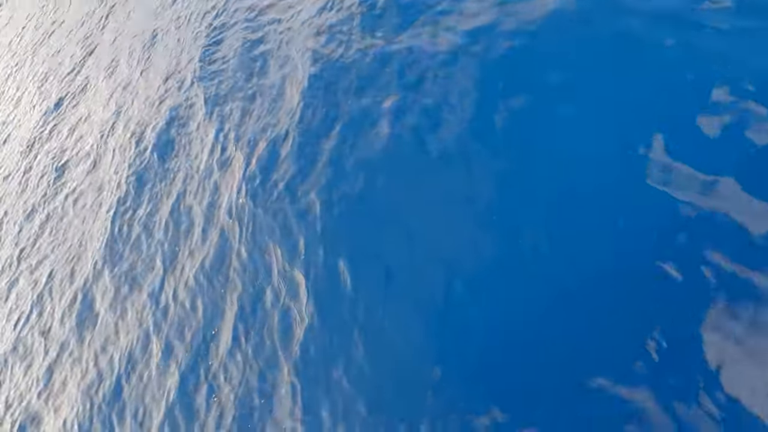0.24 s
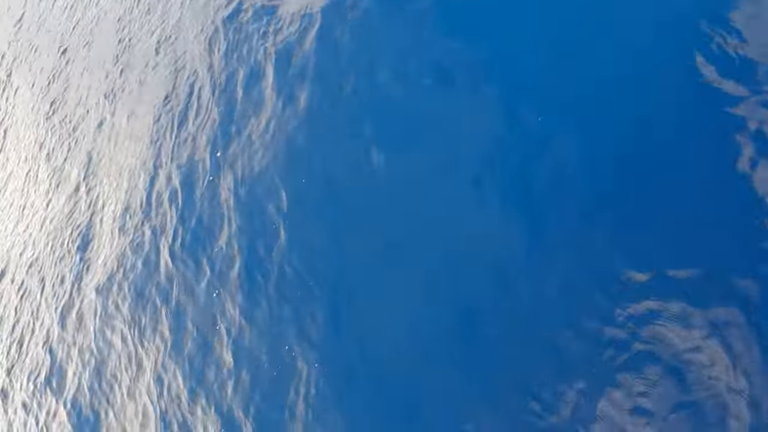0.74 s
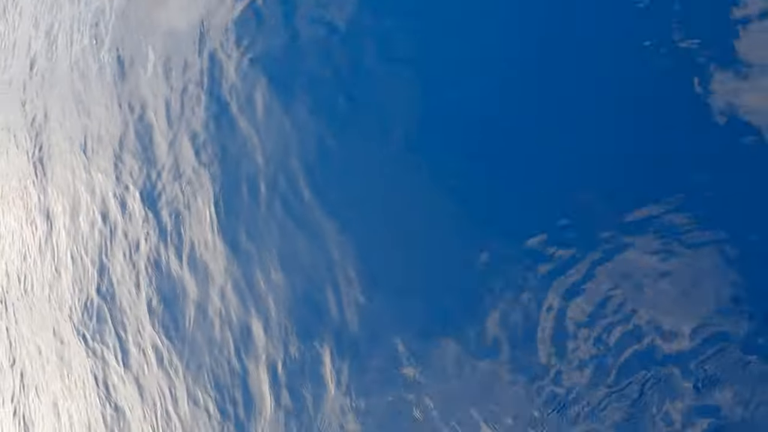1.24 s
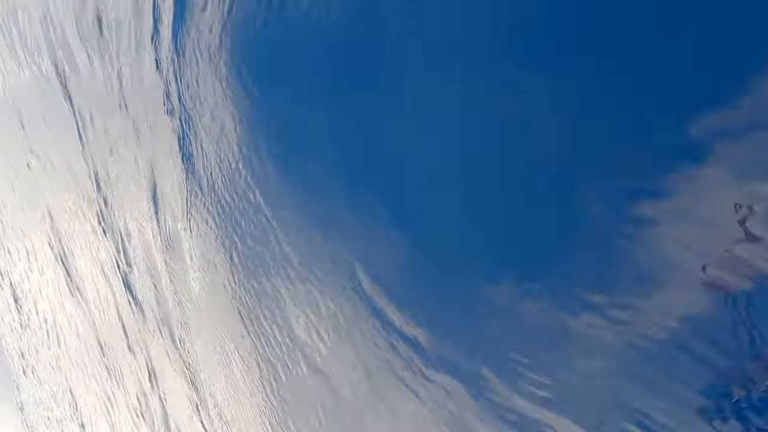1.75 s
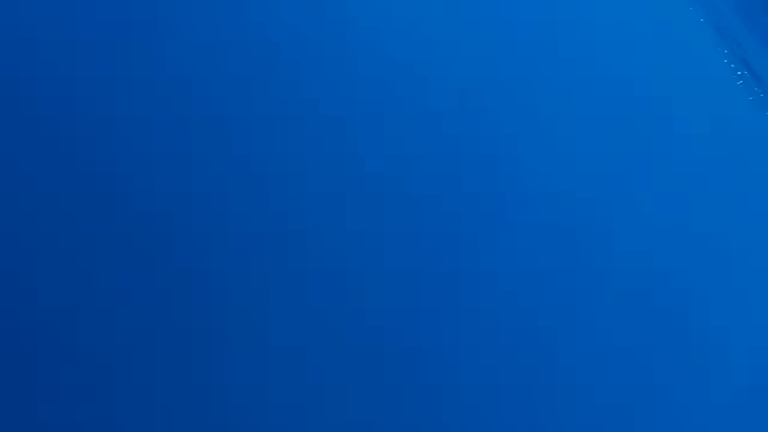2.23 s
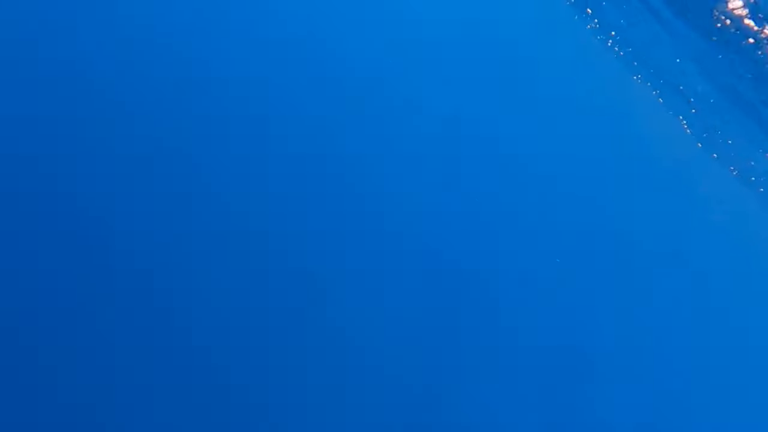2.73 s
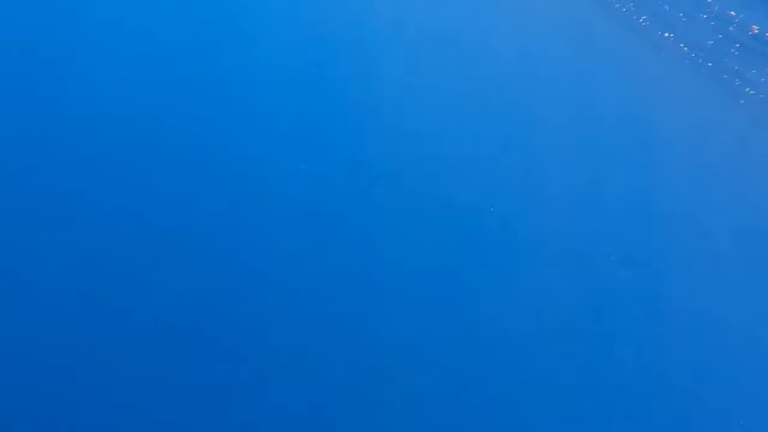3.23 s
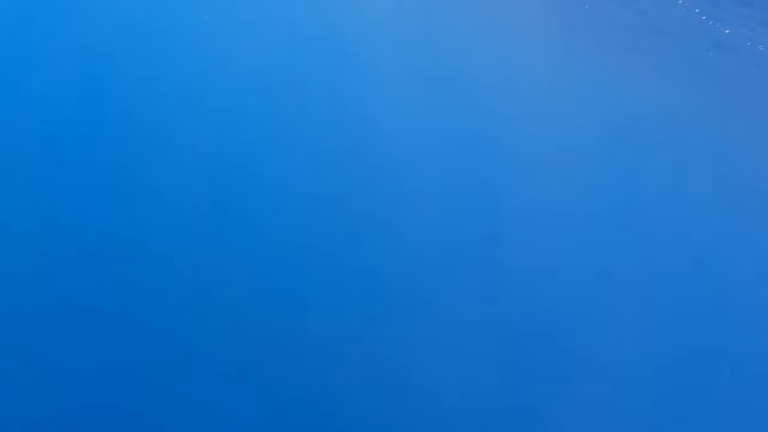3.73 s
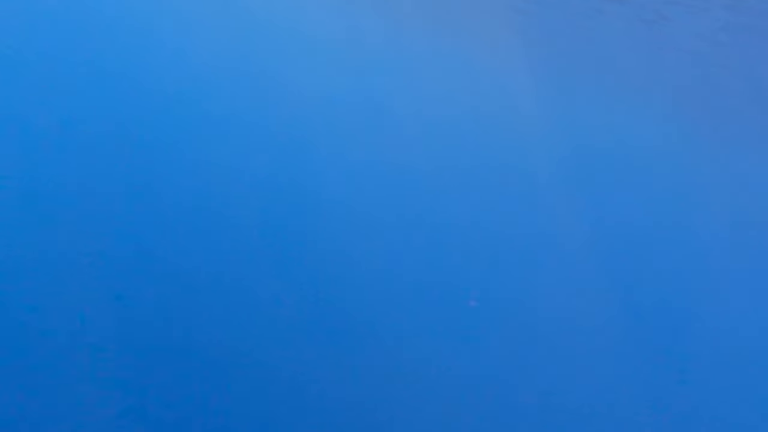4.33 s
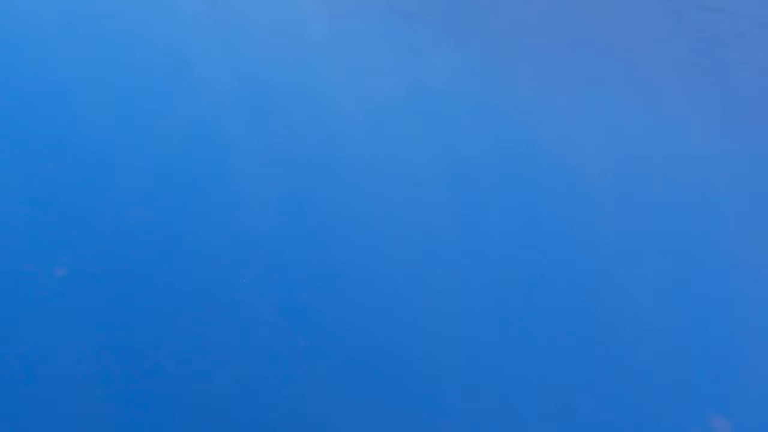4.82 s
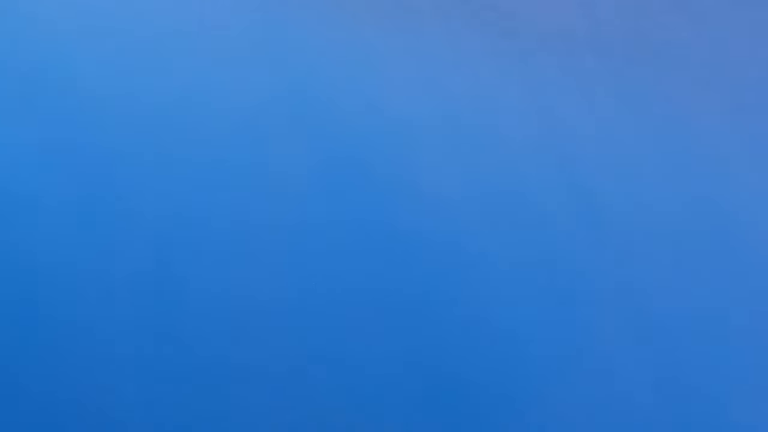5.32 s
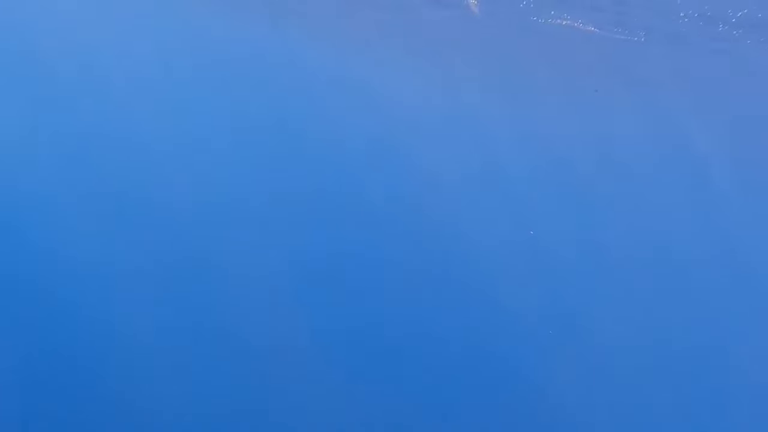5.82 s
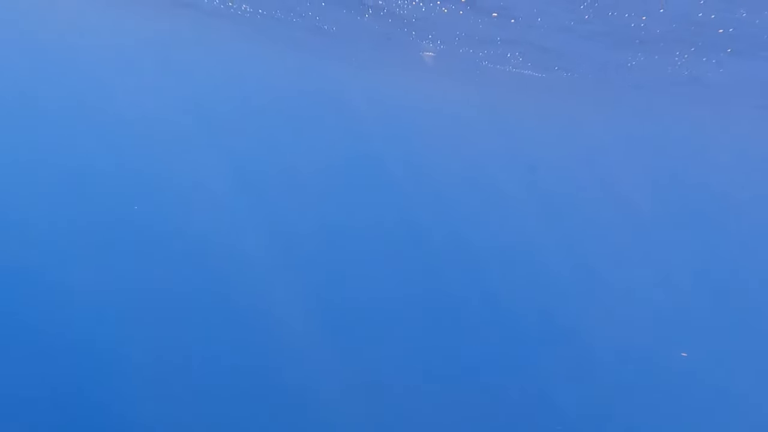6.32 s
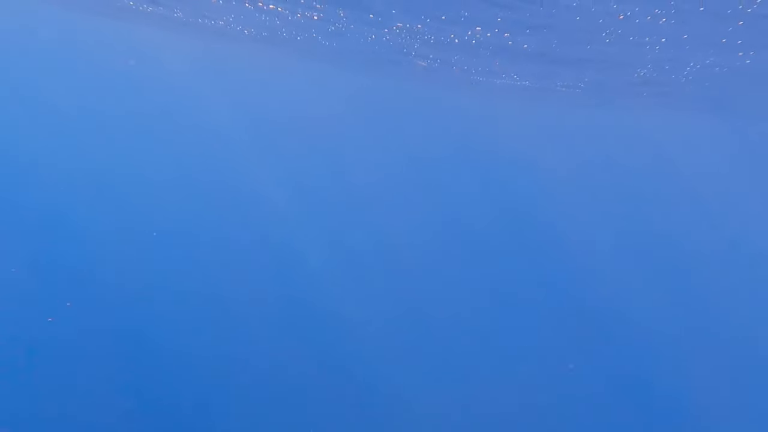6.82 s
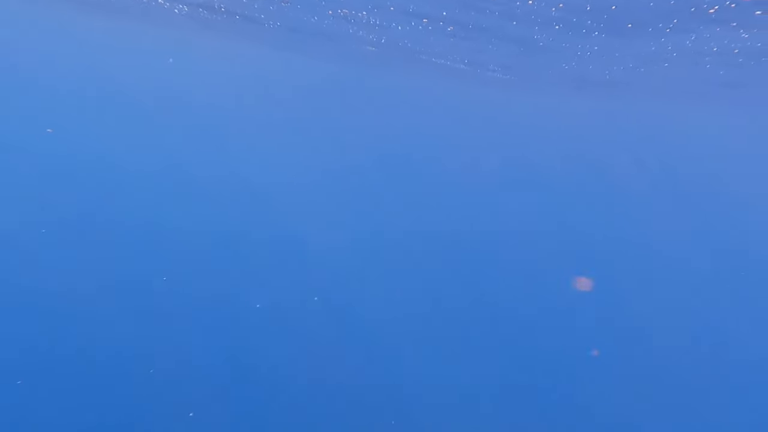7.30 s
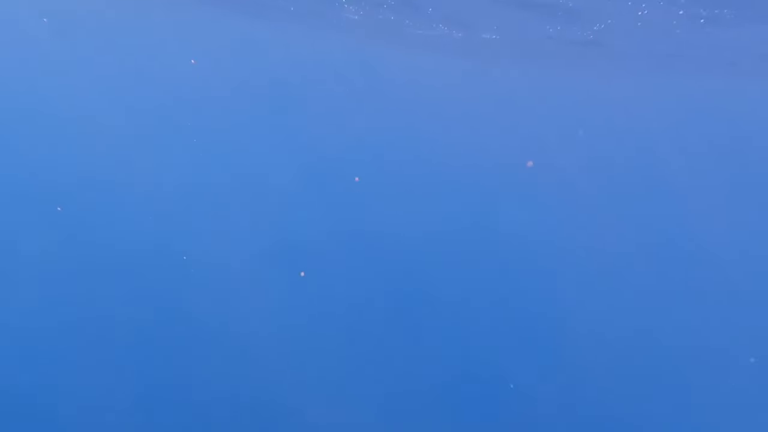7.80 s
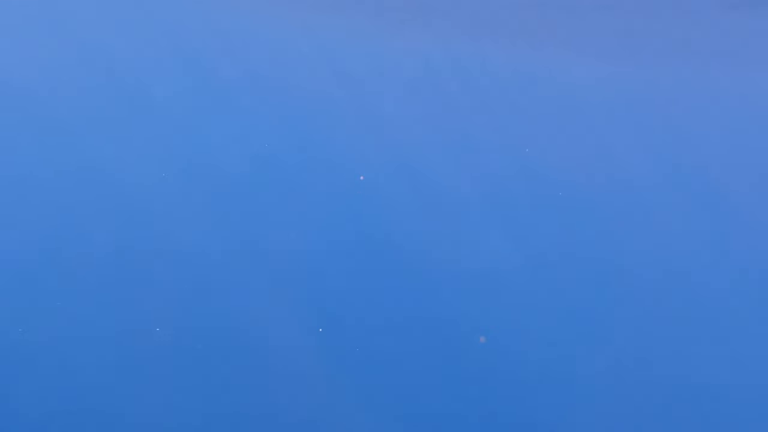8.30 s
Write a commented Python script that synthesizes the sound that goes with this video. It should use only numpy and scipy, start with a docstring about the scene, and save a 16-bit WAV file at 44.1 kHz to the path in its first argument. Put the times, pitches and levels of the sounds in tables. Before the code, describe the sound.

Low gusts in open air, a sharp splash and glugging bubbles, then a muffled underwater engine rattle joined by a wavering gear whine.

```python
"""At sea, beside an idling boat: a camera in its housing is lowered through the surface, heard by one microphone.
In air, shaped noise makes wind on the port and a distant thin hiss of engine and sea.
Then a fizzing splash with a low thump: noise spray, and damped sines for the entry and for bubbles leaving the housing.
Under water the six-cylinder engine throbs (tones) and knocks (struck resonances) through the hull;
it sags and recovers as the gear is engaged and a gear whine, a wavering tone, sets in."""
import sys
import numpy as np
from scipy import signal
from scipy.fft import rfft, irfft, next_fast_len
from scipy.io import wavfile
from scipy.ndimage import uniform_filter1d, map_coordinates

SR = 44100
rng = np.random.default_rng(int(sys.argv[2]) if len(sys.argv) > 2 else 0)


def field_ratio(decibels):
    """Amplitude ratio for a level in dB (20 dB per decade); scalars and array-likes work."""
    return 10 ** (np.asarray(decibels, dtype=float) / 20)


def inscribe(sig):
    """Save sig as 16-bit PCM at rate SR to the path in sys.argv[1].

    A 1-D sig is mono; a 2-D sig holds one channel per row.
    Samples are clipped to [-1, 1] before scaling.
    """
    pcm = np.round(np.clip(np.atleast_2d(sig).T, -1, 1) * 32767)
    wavfile.write(sys.argv[1], SR, pcm.astype(np.int16))


N = 377055


def unit(x):
    """Scaled to rms 1."""
    return x / np.sqrt(np.mean(x ** 2) + 1e-20)


def curves(rows):
    """One value per sample for each column after the time."""
    s, *columns = np.transpose(rows)
    return [np.interp(np.arange(N) / SR, s, column) for column in columns]


def during(rows):
    """1 while a table lasts, with edges smoothed over about 30 ms."""
    gate = np.interp(np.arange(N) / SR, [rows[0][0], rows[-1][0]], [1, 1], 0, 0)
    return uniform_filter1d(gate, size=SR // 30, mode="nearest")


def wobble(rate):
    """A smooth random curve, rate knots a second."""
    knots = rng.standard_normal(int(N * rate / SR) + 4)
    return map_coordinates(knots, [np.arange(N) * rate / SR])


def noise():
    """White noise of rms 1."""
    return rng.standard_normal(N)


def coloured(x, tone, modes=()):
    """x through a spectrum and resonant peaks (centre_hz, width_hz, level_db), rms 1."""
    m = next_fast_len(N + 8192)
    hz = np.fft.rfftfreq(m, 1 / SR)
    tone_hz, tone_db = np.transpose(tone)
    gain = field_ratio(np.interp(np.log(hz + 1), np.log(tone_hz + 1), tone_db))
    peaks = sum(field_ratio(db) / (1 + (2 * (hz - centre) / width) ** 2) for centre, width, db in modes)
    return unit(irfft(rfft(x, m) * gain * (1 + peaks), m)[:N])


def coloured_at_own_level(x, tone):
    """x through a spectrum, put back to the level it had."""
    return coloured(x, tone) * np.std(x)


def bubbles(s, size, hz, turns, rise):
    """Damped sines with a soft start that die away over some turns while their pitch drifts by rise."""
    t = np.arange(int(SR * 6 * turns / np.min(hz))) / SR
    age = np.outer(hz, t) / turns
    envelope = (1 - np.exp(-3 * age)) ** 2 * np.exp(-age)
    wave = size[:, None] * envelope * np.sin(2 * np.pi * turns * (age + rise * age * age / 4))
    at = (s * SR).astype(int)[:, None] + np.arange(len(t))
    return np.bincount(at.ravel(), wave.ravel(), N + len(t))[:N]


def swarm(rows, count, centre_hz, spread, turns, scatter_db):
    """Random bubbles over a table's span, pitches log-logistic round the centre, most rising, some falling; rms 1 there."""
    when, pitch, size, bend = rng.random((count, 4)).T
    s = rows[0][0] + when * (rows[-1][0] - rows[0][0])
    hz = centre_hz[(s * SR).astype(int)] * np.exp(spread * np.log(1 / np.clip(pitch, .02, .98) - 1))
    sizes = field_ratio(-scatter_db * np.log(size + 0.00061))
    x = bubbles(s, sizes, hz, turns, rise=.2 * (bend[:, None] - .35))
    return x / np.sqrt(np.mean(x[int(s.min() * SR):int(s.max() * SR)] ** 2))


def bursts(s, peak_db, rise, fall):
    """Gain of events that climb to a peak and fall away, both in dB per s; their powers add."""
    late = np.arange(N) / SR - np.asarray(s)[:, None]
    drop_db = np.where(late < 0, -rise * late, np.reshape(fall, (-1, 1)) * late)
    return np.sqrt(np.sum(field_ratio(2 * (np.asarray(peak_db)[:, None] - drop_db)), axis=0))


WIND_ENDS_S, GUST_RISE_DB_PER_S = 2.19, 1500
# gusts on the port: start of the fall (peak_s), peak_db, fall_db_per_s
GUSTS = [(0.231, -24, 250), (.36, -27, 100), (0.381, -17, 294), (.42, -25.5, 69), (0.584, -21, 51),
         (1.066, -20, 253), (1.224, -14, 249), (1.246, -14, 250), (1.288, -26, 95), (1.85, -29, 6),
         (2.037, -17.5, 81)]


def gusts():
    """Strength of the wind on the port until the water covers it: sharp rises, each with its own fall."""
    s, peak_db, fall = np.transpose(GUSTS)
    return during([(0,), (WIND_ENDS_S,)]) * bursts(s, peak_db, GUST_RISE_DB_PER_S, fall)


# air, then water, moving round the housing: time_s, rumble_db, deep_surge_db
FLOW = [(0, -34, -34.5), (1.2, -28, -27.5), (2.25, -31.5, -24), (2.36, -17, -19.5), (2.57, -26.5, -37.5),
        (2.86, -19.5, -25.5), (3.2, -26, -40), (3.31, -22.5, -28), (3.8, -33, -21.5), (4.5, -31, -33),
        (8.55, -27.5, -33)]
# spectrum of the rumble: pitch_hz, relative level_db per Hz
FLOW_TONE = [(30, -120), (50, -3), (70, 2.5), (100, -2.5), (130, -3), (200, -10), (300, -19), (400, -120)]
# spectrum of the deep surges: pitch_hz, relative level_db per Hz
SURGE_TONE = [(8, -120), (16, -11.5), (38, -2), (60, -5.5), (90, -120)]
SURGE_SWINGS_DB, SURGES_PER_S = 2.5, 6
GUST_RUMBLE_DB = -6.5  # what a gust adds to the rumble, over its own strength


def flow():
    """Air and then water moving past the housing rumble; gusts shake it too, and the deepest part comes in surges."""
    rumble_db, surge_db = curves(FLOW)
    rumble = coloured(field_ratio(0.7 * wobble(16)) * noise(), FLOW_TONE)
    rumble_gain = np.hypot(field_ratio(rumble_db), field_ratio(GUST_RUMBLE_DB) * gusts())
    surge = field_ratio(SURGE_SWINGS_DB * wobble(SURGES_PER_S)) * coloured(noise(), SURGE_TONE)
    return rumble_gain * rumble + field_ratio(surge_db) * surge


LULL_DB = -36  # wind left between gusts
# spectrum of the wind on the port: pitch_hz, relative level_db per Hz
WIND_TONE = [(65, -40), (110, 0.5), (329, -5), (361, -3.5), (419, -15.5), (459, -11.5), (542, -27),
             (800, -38), (1040, -63.5), (1760, -120)]
# hiss in air: time_s, level_db, treble_level_db
HISS = [(0, -43, -77.5), (.5, -43, -68.5), (.62, -40.5, -60), (.75, -43, -73), (1.25, -42, -72.5),
        (1.35, -46, -77), (1.8, -47.5, -89.5), (1.93, -42.5, -67.5), (2.1, -43.5, -82)]
# spectrum of the hiss: pitch_hz, relative level_db per Hz
HISS_TONE = [(290, -33), (500, -4.5), (783, -9.5), (830, -12), (964, -8.5), (1550, -15), (1990, -17),
             (2810, -17.5), (7840, -56.5), (10200, -72), (17200, -120)]
# spectrum of its treble: pitch_hz, relative level_db per Hz
HISS_TOP = [(3000, -42), (4200, -4), (5200, -2), (6200, -21), (8000, -59.5)]


def air():
    """Lumpy wind buffet on the port and a distant hiss of engine and sea, all shaped noise."""
    buffet = coloured(field_ratio(1.2 * wobble(38)) * noise(), WIND_TONE)
    wind = np.hypot(gusts(), field_ratio(LULL_DB) * during([(0,), (WIND_ENDS_S,)]))
    hiss = coloured(field_ratio(1.2 * wobble(20) + 1.2 * wobble(90)) * noise(), HISS_TONE)
    top = coloured(noise(), HISS_TOP)
    hiss_db, top_db = curves(HISS)
    return wind * buffet + during(HISS) * (field_ratio(hiss_db) * hiss + field_ratio(top_db) * top)


# films of water snapping on the port, close to the microphone: start_s, peak_db
SNAPS = [(2.1047, -14.5), (2.118, -12.5), (2.1763, -40.5), (2.2863, -42), (2.338, -24.5), (2.362, -40),
         (2.4646, -46), (2.6702, -35), (2.6813, -39.5), (2.9702, -53.5), (3.0056, -55)]
# spectrum of a snap: pitch_hz, relative level_db per Hz
SNAP_TONE = [(800, -46.5), (2500, 4), (6000, -8), (9000, -21.5), (12000, -40)]


def snaps():
    """Films of water snap as single sharp clicks, a fraction of a millisecond long."""
    s, db = np.transpose(SNAPS)
    spikes = np.bincount((s * SR).astype(int), field_ratio(db), N)
    clicks = coloured(spikes, SNAP_TONE)
    return clicks * spikes.max() / np.abs(clicks).max()


# housing breaking the surface: time_s, fizz_db, fizz_centre_hz, spray_db
FIZZ = [(2.05, -47.5, 1320, -82), (2.07, -65, 3000, -71.5), (2.114, -29, 3830, -24.5),
        (2.192, -22, 2130, -62), (2.23, -38, 2900, -62.5), (2.29, -29, 2150, -49.5),
        (2.302, -31.5, 2250, -63), (2.37, -30, 1700, -56.5), (2.484, -44, 1374, -63.5),
        (2.5, -74, 1424, -103)]
# spectrum of the spray: pitch_hz, relative level_db per Hz
SPRAY_TONE = [(2000, -54), (4000, -0.5), (6000, -7), (8000, -22.5), (11000, -36.5), (15000, -47)]


def surface():
    """Breaking the surface: a fizz of very many small bubbles that comes in clumps, under noise spray."""
    fizz_db, fizz_hz, spray_db = curves(FIZZ)
    fizz = swarm(FIZZ, count=1100, centre_hz=fizz_hz, spread=.14, turns=3.5, scatter_db=3.3)
    fizz = fizz * unit(field_ratio(5 * wobble(80)))
    spray = coloured(field_ratio(3.0 * wobble(120)) * noise(), SPRAY_TONE)
    return during(FIZZ) * (field_ratio(fizz_db) * fizz + field_ratio(spray_db) * spray)


# air still leaving the housing: time_s, gurgle_db, treble_db
GURGLE = [(2.1, -37, -28.5), (2.2, -53, -56), (2.262, -46, -29.5), (2.36, -19, -28.5),
          (2.425, -13.5, -32.5), (2.445, -36, -49), (2.485, -27.5, -45.5), (2.63, -22.5, -63),
          (2.7, -28.5, -47.5), (2.83, -17.5, -40), (2.93, -21, -59), (3.36, -31.5, -63), (3.6, -33, -75)]
# bigger gulps of air on top of it: peak_s, peak_db, treble_peak_db
GLUGS = [(2.156, -28, -28), (2.398, -14, -43), (2.539, -23.5, -39.5), (2.57, -24.5, -41.5),
         (2.667, -24, -32.5), (2.766, -18.5, -34), (2.886, -17, -34), (3.008, -32, -39.5),
         (3.166, -20, -55), (3.305, -33, -63.5), (3.516, -28.5, -59)]
GLUG_RISE_DB_PER_S, GLUG_FALL_DB_PER_S = 352.5, 212
TREBLE_DB_PER_S = 799  # rise and fall alike
# what the flooded hollows of the housing let through: pitch_hz, relative level_db
HOLLOWS = [(120, -31), (250, -7.5), (500, -7.5), (820, -1.5), (1000, -7), (1400, -10), (3000, -66.5)]
# water closing over the port dulls the small bubbles: pitch_hz, relative level_db
WET_PORT = [(400, -22.5), (1000, 3.5), (3000, -3.5), (3600, -7), (6000, -36.5), (12000, -71)]


def gurgle():
    """Air gurgles out of the hollows: a low and a high swarm of bubbles, swelling at each gulp."""
    low_db, high_db = curves(GURGLE)
    s, peak_db, treble_db = np.transpose(GLUGS)
    low_gain = np.hypot(field_ratio(low_db), bursts(s, peak_db, GLUG_RISE_DB_PER_S, GLUG_FALL_DB_PER_S))
    high_gain = np.hypot(field_ratio(high_db), bursts(s, treble_db, TREBLE_DB_PER_S, TREBLE_DB_PER_S))
    low = swarm(GURGLE, count=1000, centre_hz=np.full(N, 540.), spread=.18, turns=6, scatter_db=1.2)
    high = swarm(GURGLE, count=3200, centre_hz=np.full(N, 1800.), spread=0.17, turns=4.2, scatter_db=3.5)
    low = coloured_at_own_level(low, HOLLOWS)
    high = coloured_at_own_level(high, WET_PORT)
    return during(GURGLE) * (low_gain * low + high_gain * high)


# large bubbles, and the low thump (62 Hz) and knock (430 Hz, 2.148 s) of the housing entering the water:
# start_s, level_db before the envelope, pitch_hz, decay_turns, pitch_rise (ratio, below 0 falls)
ENTRY_AND_BUBBLES = [(2.369, -5, 258.6, 5.9, .05), (2.395, -3, 322, 6.4, .03), (2.474, -2.5, 390, 2.4, .03),
                     (2.143, -5, 61.96, 1.1, 0.012), (2.148, -5.5, 430, 1.5, -0.0012),
                     (2.412, -16, 535, 2, 0.018), (2.465, -9, 753, 9, 0), (2.512, -14, 731, 12, 0.033),
                     (2.552, -3, 441, 10, .14), (2.606, -22, 1090, 11, 0.021), (2.662, -3, 824, 5, -0.027),
                     (2.664, -3, 552, 11, 0.18), (2.76, -10.5, 1184, 6.4, 0),
                     (3.022, -4.5, 640, 4.2, 0.016), (3.168, -4.5, 340, 2.4, 0.0094),
                     (3.248, -6, 600, 4.5, 0.03), (3.26, -17.5, 1110, 11, 0.011),
                     (3.37, -6, 616, 3.7, -0.039), (3.399, -11, 348.6, 2.3, 0), (3.4, -17, 1060, 10, .05),
                     (3.521, -16.5, 1018, 7.2, 0), (3.526, -15.5, 1300, 7.3, 0),
                     (3.555, -8.5, 646, 11, -0.041), (2.762, -11, 751, 5.4, -0.014),
                     (2.878, -4, 691, 12, -0.18), (2.915, -7, 539, 10, -0.13), (2.945, -9.5, 741, 10, 0),
                     (3.076, -10.5, 412, 9, .05), (3.478, -7.5, 643, 14, 0), (3.072, -6, 537, 4.8, 0.022),
                     (3.167, -6, 470, 4.8, -.08), (3.158, -9, 718, 9, 0.065),
                     (3.27, -2.5, 455, 4.6, -0.019), (3.298, -0.5, 429, 3.2, .02),
                     (3.405, -6, 621, 8, -0.0038)]
# small bubbles and drops on the housing: start_s, level_db before the envelope, pitch_hz
TICKS = [(.12, -29, 1630), (1.171, -26.5, 1600), (2.098, -12, 2890), (2.106, -17, 3000), (2.117, -7, 4600),
         (2.125, -2.5, 3560), (2.136, -14, 3180), (2.149, -10, 3620), (2.183, -8.5, 1310),
         (2.187, -4, 2260), (2.2, -5, 2570), (2.2615, -15, 2620), (2.277, -9, 2780), (2.2874, -7.5, 2430),
         (2.309, -7.5, 1173), (2.3361, -7.5, 2840), (2.339, -9, 3230), (2.363, -25, 5170),
         (2.412, -19, 2140), (2.5376, -30, 2060), (2.5642, -28, 2630), (2.8426, -21.5, 1850),
         (2.8732, -25.5, 1960), (2.9702, -32, 1970), (3.0054, -34, 1890), (3.782, -34, 1900)]


def entry_and_single_bubbles():
    """The housing's entry thump and knock, and bubbles and drops heard one by one, each a damped sine."""
    entry_and_large = sum(bubbles(np.array([s]), field_ratio(np.array([db])), np.array([hz]), turns, rise)
                          for s, db, hz, turns, rise in ENTRY_AND_BUBBLES)
    s, db, hz = np.transpose(TICKS)
    return entry_and_large + bubbles(s, field_ratio(db), hz, turns=4.1, rise=0.1)


# engine speed: time_s, firings_per_s
SPEED = [(0.0, 26.75), (3.3, 25.94), (4.0, 26.63), (4.6, 26.07), (5.15, 26.37), (5.35, 23.76), (5.55, 23.5),
         (5.7, 22.43), (5.9, 25.2), (6.15, 25.01), (6.5, 24.52), (7.2, 25.03), (7.9, 24.64), (8.55, 25.08)]


def firings():
    """Running count of cylinder firings; six make an engine cycle."""
    return np.cumsum(curves(SPEED)[0]) / SR


# gear whine: time_s, pitch_hz, level_db
WHINE = [(5.2, 670, -48), (5.39, 703, -22), (5.62, 672, -24), (5.72, 715, -30), (5.98, 748, -34),
         (6.2, 735, -38), (6.38, 720, -25), (6.55, 738, -36), (6.78, 748, -29.5), (7.1, 742, -28.5),
         (8.55, 742, -28.5)]
# a faint gear line that moves with the whine once the speed settles: ratio to its pitch, rms dB, start
OVERTONE, OVERTONE_DB, OVERTONE_FROM_S = 1.5, -42, 6.8
# dull thumps through the hull: start_s, pitch_hz, peak_db, length_s
THUMPS = [(2.552, 116, -20, 0.18), (2.806, 124.3, -22.5, 0.11), (5.231, 95.8, -19, 0.18),
          (7.421, 107.5, -20, 0.091)]


def gear():
    """A tooth whine that sags slowly and springs back once an engine cycle, and dull thumps."""
    hz, db = curves(WHINE)
    sag = during([(5.7,), WHINE[-1]]) * signal.sawtooth(2 * np.pi * (firings() - 3.55) / 6, .3)
    hz = hz + 12 * sag + 1.5 * wobble(30)
    phase = 2 * np.pi * np.cumsum(hz) / SR
    whine = np.sqrt(2) * during(WHINE) * field_ratio(db + 1.2 * wobble(14)) * np.sin(phase)
    overtone = np.sqrt(2) * field_ratio(OVERTONE_DB + 3 * wobble(12)) * np.sin(OVERTONE * phase + wobble(25))
    out = whine + during([(OVERTONE_FROM_S,), WHINE[-1]]) * overtone
    t = np.arange(N) / SR
    for s, thump_hz, thump_db, length in THUMPS:
        arch = np.sin(np.pi * np.clip((t - s) / length, 0, 1))
        out = out + field_ratio(thump_db) * arch * np.sin(2 * np.pi * thump_hz * t)
    return out


# in air the exhaust carries the middle orders, under water the hull carries the first:
# time_s, then level_db of firing orders 1, 2, 3, 4
THROB = [(0, -28.5, -58, -39, -30), (1, -29.5, -35, -30, -56), (1.9, -61.5, -21, -23.5, -54),
         (2.6, -56, -42, -36.5, -28.5), (3.1, -21, -25.5, -36, -31.5), (4, -18.5, -35.5, -25, -33),
         (4.6, -16, -27, -27, -39), (5.7, -13.5, -29.5, -29.5, -32), (6.2, -14, -30, -24, -35.5),
         (7.6, -13, -27.5, -26.5, -36), (8.1, -12, -31, -27.5, -36), (8.55, -13, -29.5, -38, -35)]
# under load the propeller pulls the throb ahead of the firing: time_s, lead_rad
LEAD = [(0, 1.4), (5.2, 1.4), (5.42, 3.3), (8.55, 3.4)]


def throb(fired):
    """Low firing orders as clean tones; all but the first waver in level and phase."""
    angles = [curves(LEAD)[0], -2.4, -1.2, 1]  # rad
    waver_db, waver_rad = .9, .2  # times 0, 1, 2, 3 for the four orders
    out = np.zeros(N)
    for k, db in enumerate(curves(THROB)):
        phase = 2 * np.pi * (k + 1) * fired + angles[k] + waver_rad * k * wobble(6.3)
        out = out + np.sqrt(2) * field_ratio(db + waver_db * k * wobble(5.4)) * np.cos(phase)
    return out


# the hull heard through water: pitch_hz, relative level_db per Hz
HULL_TONE = [(110, -48), (190, -21.5), (275, -9.5), (318, -13), (410, -9.5), (468, -3.5), (555, -8),
             (651, -5), (795, -7), (830, -16.5), (1140, -21.5), (1260, -21.5), (1580, -24.5), (1800, -40),
             (4500, -70), (5850, -109), (9900, -120)]
# hull resonances on top of that: pitch_hz, width_hz, level_db
PLATES = [(352, 110, 0), (482, 52, -1.5), (655.3, 70, 7), (1174, 140, 5.5), (1840, 710, 4.5)]


def hull_rush(fired, since, pulsed):
    """Noise of the shaken hull: a share of its power swells with each firing, the rest is steady."""
    # a cylinder shakes the hull nearly the same way each time: part of the noise repeats with the engine cycle
    same = np.interp(fired % 6, np.linspace(0, 6, num=9000), rng.standard_normal(9000))
    shake = .9 * unit(same) + .4 * noise()
    hz, db = np.transpose(HULL_TONE)
    heavy = np.c_[hz, db - np.interp(hz, [1150, 1400], [0, 14])]  # only the heavy plates ring on after the blow
    early = (since + 0.091) % 1  # pressure builds a little before the knock
    swell = coloured(early * np.exp(-early / 0.24) * shake, heavy, PLATES)
    steady = coloured(shake, HULL_TONE, PLATES)
    share = np.clip(pulsed, 0, 1)
    return np.sqrt(share) * swell + np.sqrt(1 - share) * steady


# what each firing rings: pitch_hz, relative level_db, decay_turns
KNOCK = [(1555, -8, 4.6), (1423, -9.5, 3.9), (1184, -17.5, 8.4), (1060, -19, 6.9), (943, -13, 6),
         (759.3, -8.5, 8.7), (647.3, 3, 7.4), (480, -12.5, 4.3), (340, -11, 3.3)]
# cylinders sit nearer some plates than others: level_db of each of the six firings at idle, one row per KNOCK mode
REACH = [(0, -3, 2, 0, -0.5, -2.5), (3.5, -1, -3, -1, 2.5, -1), (-4, 3.5, -1.5, 1, 0.5, -4.5),
         (-9.5, -6.5, -9, 3.5, -5.5, -0.5), (3.5, -2, -2, -4.5, -3.5, -9), (-4, -2.5, -6, 2.5, 2, -7),
         (0.5, -0.5, -3.5, -3, -3.5, -0.5), (-6.5, -4, 0.5, 2, 3, -8.5), (5, -3.5, -5.5, 5.5, -5.5, -3)]
# the same with the propeller turning: level_db of each of the six firings, one row per KNOCK mode
LOADED_REACH = [(0.5, 1, 2.5, 2, 1.5, 4), (3, 6.5, 3, -2.5, 4, 1.5), (3.5, 5, 0.5, 7, 4.5, 7),
                (6, 0.5, 3, 8.5, 2.5, -0.5), (5.5, -3, 2, 10.5, 7, -0.5), (1, -3.5, -2.5, 1, -5.5, -10),
                (2, -7.5, -3, -5, -14, 1.5), (-2, -4, -1.5, -2.5, -6.5, -2),
                (-2.5, -3.5, -1.5, -2, -7.5, 3.5)]
ENGAGED_S = 5.3
# water and housing round off the knock: pitch_hz, relative level_db
MUFFLE = [(200, 1), (1700, -0.5), (1850, -20), (2300, -8.5), (3200, -24.5), (6000, -72)]
# valve gear: pitch_hz, relative level_db per Hz
RATTLE_TONE = [(1600, -35), (1900, 4.5), (2400, -11), (3000, -16), (4000, -31), (5500, -62)]
# valve rattle, before the knock's own gain: time_s, level_db
RATTLE = [(3.3, -50.5), (4.4, -46), (4.8, -47.5), (6.9, -46.5), (7.7, -50)]


def hull_knock(stroke, since):
    """Each firing strikes the hull's modes into damped ringing, with valve rattle over it."""
    at = np.flatnonzero(np.diff(since) < 0)
    s = at / SR
    which = stroke[at + 1].astype(int) % 6
    uneven_db, detune, spread_s = 1.0, .004, .002
    knock = np.zeros(N)
    for (hz, db, turns), idle, loaded in zip(KNOCK, REACH, LOADED_REACH):
        # from each cylinder the blow reaches the heavy plates at its own delay
        delay = spread_s * rng.random(6)[which] * (hz < 900)
        reach_db = np.where(s < ENGAGED_S, np.take(idle, which), np.take(loaded, which))
        size = field_ratio(db + reach_db + uneven_db * rng.standard_normal(len(at)))
        pitch = hz * (1 + detune * rng.standard_normal(len(at)))
        knock = knock + bubbles(s + delay, size, pitch, turns, rise=0)
    rattle = coloured((0.25 + np.exp(-since / 0.17)) * noise(), RATTLE_TONE)
    return coloured_at_own_level(knock, MUFFLE) + field_ratio(curves(RATTLE)[0]) * rattle


# engine through the hull: time_s, rush_db, share of the rush that swells with the firing (0-1), knock_gain_db
HULL = [(2.9, -29.5, 0.03, -59), (3.3, -33, 0.6, -29.5), (3.6, -24, 0.7, -12.5), (4.5, -24, 0.64, -11.5),
        (5.2, -24.5, 0.87, -14), (5.45, -23, 0.2, -16), (5.9, -23.5, 0.36, -16.5), (7, -24.5, 0.33, -13.5),
        (8.55, -25.5, 0.2, -17.5)]


def engine():
    """The firing count drives throb, hull rush and knock together; rush and knock come in under water."""
    fired = firings()
    stroke = fired - .33  # the blow comes a third of a firing after the count
    since = stroke % 1
    rush_db, pulsed, knock_db = curves(HULL)
    rush = field_ratio(rush_db) * hull_rush(fired, since, pulsed)
    knock = field_ratio(knock_db) * hull_knock(stroke, since)
    return throb(fired) + during(HULL) * (rush + knock)


def scene():
    """Everything reaches one microphone."""
    splash = surface() + gurgle() + entry_and_single_bubbles()
    return (flow() + air() + snaps() + splash + gear() + engine())[None]


def top_cut(x):
    """Nothing passes above the cut-off."""
    return signal.sosfilt(signal.butter(12, 14200, fs=SR, output="sos"), x)


def record(dry):
    """The loudest peaks are squeezed below 0.95 of full scale; a faint preamplifier hiss joins in."""
    squeezed = dry / (1 + np.abs(dry / .95) ** 6) ** (1 / 6)
    hiss_tone = [(1000, -3.0), (4000, -8.0), (6500, -9), (8000, -34.0), (20000, -38)]  # pitch_hz, level_db per Hz
    hiss = field_ratio(-81 + 2 * wobble(3)) * coloured(noise(), hiss_tone)
    return top_cut(squeezed + hiss)


dry = scene()
out = record(dry)
inscribe(out)
```